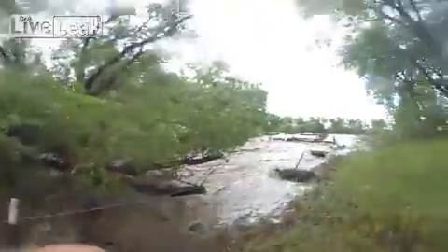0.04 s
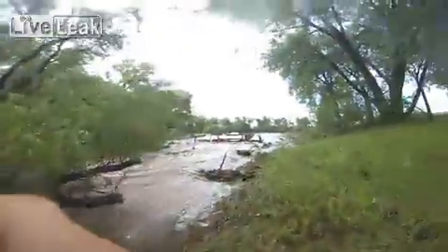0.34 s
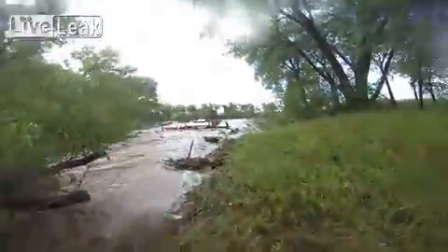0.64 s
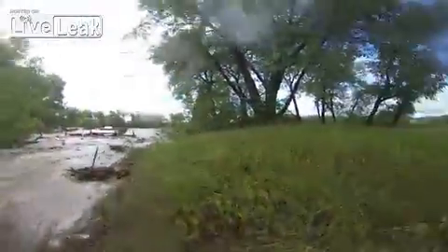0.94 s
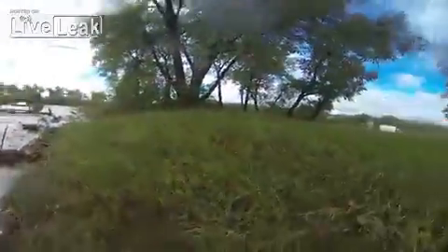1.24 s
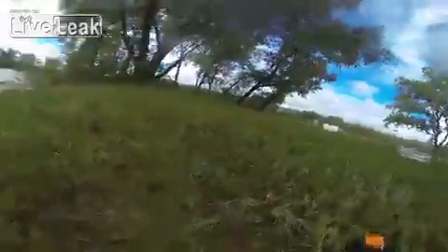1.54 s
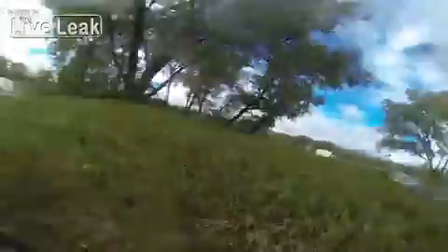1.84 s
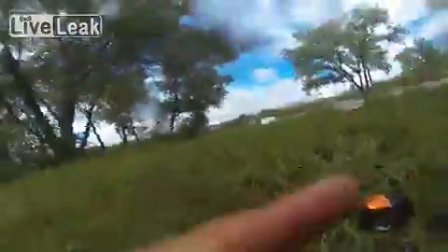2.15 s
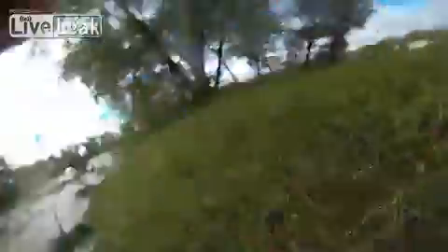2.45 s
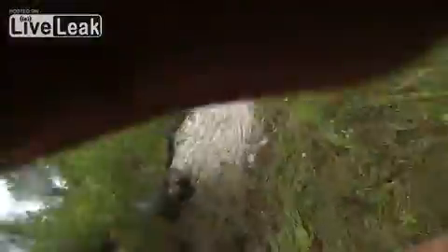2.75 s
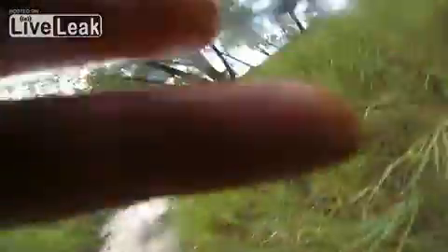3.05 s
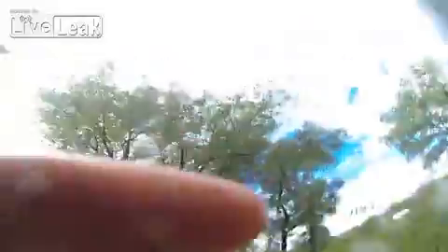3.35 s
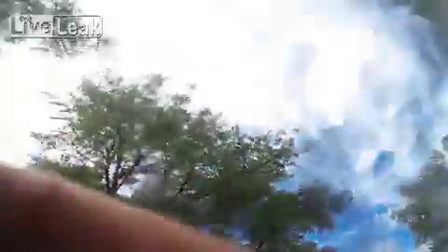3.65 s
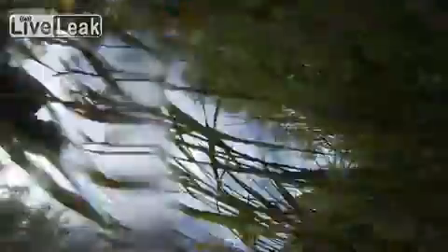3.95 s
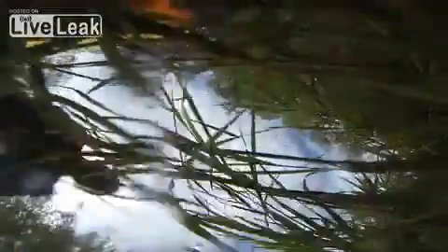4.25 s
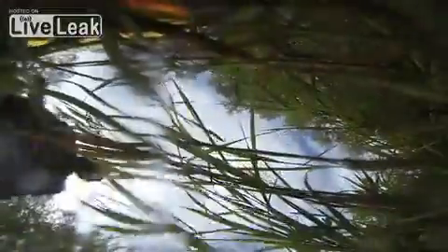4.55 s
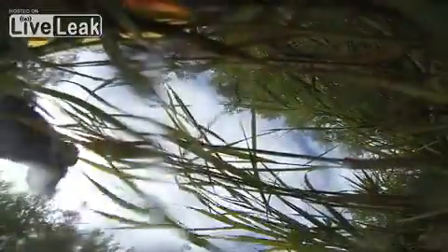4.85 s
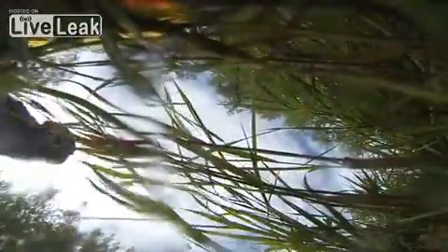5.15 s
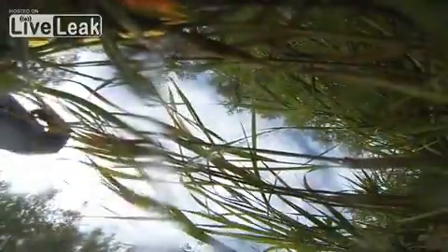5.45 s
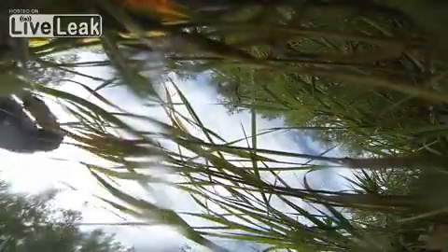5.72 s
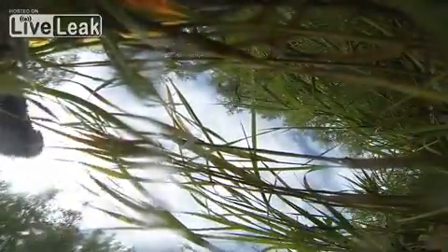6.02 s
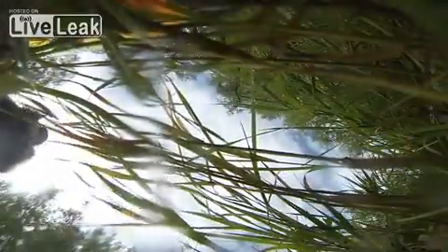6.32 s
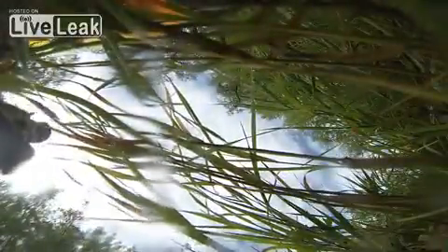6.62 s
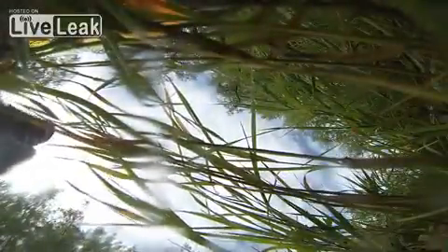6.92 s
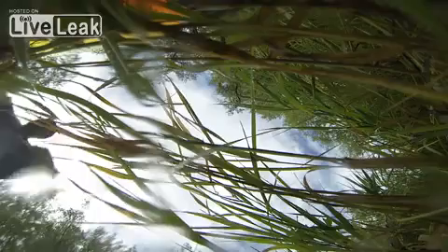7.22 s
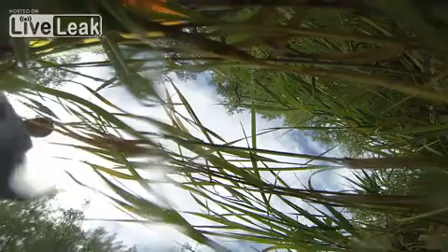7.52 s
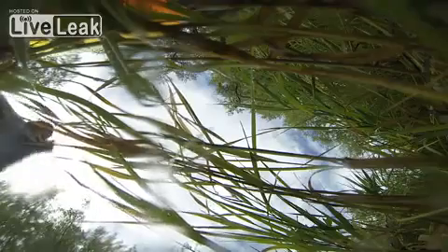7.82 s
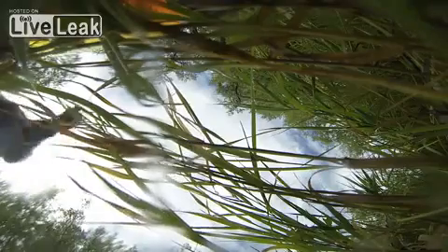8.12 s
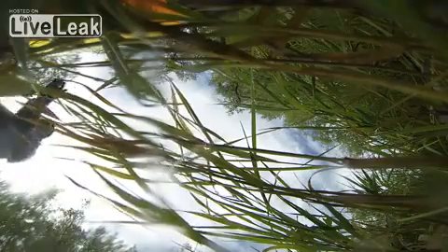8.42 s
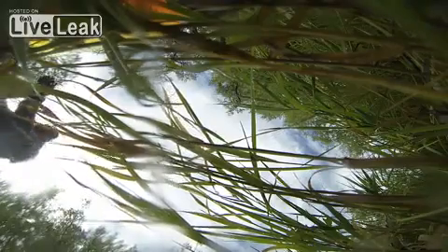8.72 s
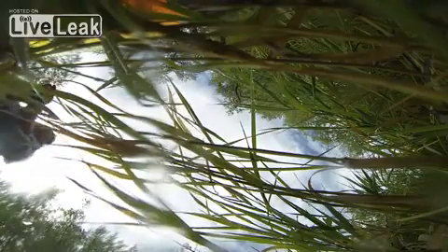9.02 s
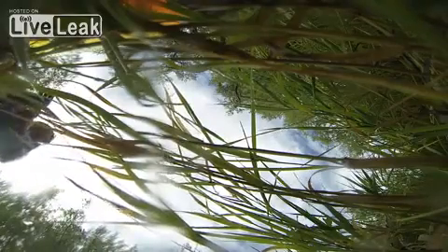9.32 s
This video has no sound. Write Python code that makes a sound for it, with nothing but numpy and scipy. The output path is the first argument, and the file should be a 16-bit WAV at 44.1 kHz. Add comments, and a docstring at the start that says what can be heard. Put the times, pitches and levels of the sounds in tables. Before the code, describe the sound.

Close finger knocks and rubbing on a plastic housing end in a scrape through grass, leaving a soft river hiss and light rustling steps.

```python
"""On the bank of a flooded river, in long grass, heard from one microphone inside a camera's plastic housing.
The camera is carried and fumbled: fingers thump, click and scuff on the shell, air buffets the port.
At 3.5 s it is dropped, slides through the stalks and lands. Then it lies still: the river, some way off,
hisses with countless small splashes, and someone shifts about in the grass nearby."""
import sys
import numpy as np
from scipy import signal
from scipy.fft import rfft, irfft, next_fast_len
from scipy.io import wavfile
from scipy.ndimage import uniform_filter1d

SR = 44100
rng = np.random.default_rng(int(sys.argv[2]) if len(sys.argv) > 2 else 0)


def wrap_up_sound(samples):
    """Save the sound to the file named by the first command line argument, as 16-bit audio."""
    columns = np.atleast_2d(samples).T
    # keep every value between -1 and 1, then stretch to whole-number steps
    tamed = np.clip(columns, -1, 1)
    steps = np.round(tamed * 32767).astype(np.int16)
    wavfile.write(sys.argv[1], SR, steps)


N = 417627
TIME = np.arange(N) / SR
AT_REST_S, SETTLE_S = 4.3, 0.3  # the camera starts coming to rest; the time it takes
CUTOFF_HZ = 9990

# Levels in the tables are relative: each source adds its own trim. # Level of the river's hiss at the
# microphone, low during the handling and rising from about 4 s: time_s, level_db
RIVER_CURVE = [(0, -72.5), (3.9, -71.5), (4.3, -58), (4.55, -50.5), (4.9, -47), (9.47, -47.5)]
# Spectrum of the river's low rush: frequency_hz, level_db
RUSH_SPECTRUM = [(12, -21.5), (20, 2.5), (107, -1.5), (323, -2), (364, -5.5), (460, -5), (1100, -14.5),
                 (1430, -47), (2420, -120)]
# Spectrum of its small splashes: frequency_hz, level_db
SPLASH_SPECTRUM = [(590, -41.5), (1000, -43), (1170, -4), (1320, 4), (1600, 2.5), (1920, -7), (2530, -8.5),
                   (2950, -2), (3930, -7.5), (4450, -16.5), (4940, -11), (5600, -18.5), (6340, -17),
                   (7900, -19), (9840, -35), (12800, -74.5), (21600, -120)]
# Someone treading and shifting in the grass nearby: start_s, length_s, tread_db, rustle_db
FOOTSTEPS = [(4.425, 0.031, -39, -48), (4.513, .14, -48, -52), (4.717, .04, -46.5, -49),
             (4.912, 0.16, -43, -44.5), (5.097, 0.088, -45, -45.5), (5.187, 0.032, -40.5, -64),
             (5.315, 0.036, -43, -62), (5.67, 0.1, -46, -60), (6.15, 0.22, -50, -71),
             (6.41, 0.025, -44.5, -59), (6.94, .04, -53, -59), (7.188, 0.055, -51, -50),
             (7.304, 0.038, -40.5, -48), (7.378, 0.024, -49.5, -54), (8.284, 0.038, -53, -56)]
# Air flowing past the microphone port as the camera swings: time_s, level_db
AIRFLOW_CURVE = [(0.0, -28.5), (0.44, -35.5), (1.24, -26.5), (1.35, -39.5), (1.62, -31.5), (2.2, -23.5),
                 (2.42, -20.5), (2.79, -27), (2.99, -21.5), (3.5, -32.5), (3.77, -33), (4.3, -56.5)]
# Spectrum of the eddies at the port: frequency_hz, level_db
EDDY_SPECTRUM = [(10, -22.5), (20, -8), (30, 0), (50, -15.5), (80, -23.5), (140, -25.5), (300, -48.5),
                 (800, -94)]
# Resonances of the housing: frequency_hz, width_hz, level_db
SHELL_MODES = [(589, 57, -4.5), (780, 355, -10), (1150, 69, 0.5), (1450, 263, 4.5), (1581, 258, 4.5),
               (2130, 247, -7.5), (2600, 590, -13), (3090, 315, -8.5), (3550, 1180, -19.5),
               (5140, 470, -21.5), (6300, 1500, -34.5)]
# Spectrum of dull rubbing: frequency_hz, level_db
RUB_SPECTRUM = [(30, -6.5), (70, -3.5), (130, -6), (195, 4.5), (260, -8.5), (350, -7), (480, -18),
                (750, -21), (1200, -40), (3000, -97)]
# Spectrum of the fine hiss of sliding: frequency_hz, level_db
HISS_SPECTRUM = [(1500, -13.5), (3000, 3), (3800, 12), (4600, 7.5), (5400, 6.5), (7000, 1.5), (8500, -3.5),
                 (10000, -19)]
# The camera ploughs through grass, then stalks settle on it:
# start_s, length_s, scrape_db, dull_db, rustle_db
GRASS_SLIDES = [(3.637, 0.084, -24, -22.5, -29.5), (3.743, 0.034, -26, -24, -42),
                (3.816, 0.032, -25, -25.5, -25.5), (3.929, .07, -35, -38.5, -41),
                (4.066, 0.12, -45, -45, -46)]
# The hand's steady grip, which lets go in the grass: time_s, dull_db, rustle_db
GRIP_CURVE = [(0.0, -34, -40.5), (0.33, -45.5, -52.5), (0.86, -29, -43.5), (1.17, -33.5, -47.5),
              (1.33, -48.5, -56), (1.56, -39, -51.5), (1.82, -30.5, -51), (1.9, -42, -51.5),
              (2.41, -42.5, -47.5), (2.69, -43, -45), (3.41, -42, -42.5), (3.71, -38, -40),
              (3.83, -29, -34.5), (4.3, -48.5, -56)]
# Skin, cloth and grass sliding over the shell: middle_s, length_s, level_db, ring_hz, hiss_db, dull_db
SHELL_SCUFFS = [(0.12, 0.06, -33, 1030, -53, -29.5), (0.278, 0.059, -39, 1290, -49, -39),
                (0.358, 0.047, -44, 1440, -68, -36.5), (0.476, 0.027, -42, 1450, -61, -32.5),
                (0.558, 0.029, -43, 1450, -66, -28.5), (0.61, 0.0064, -25, 1600, -60, -26),
                (0.775, 0.054, -40, 1450, -64, -47), (0.886, 0.052, -42.5, 600, -79, -32.5),
                (1.039, 0.016, -30, 2660, -66, -41), (1.04, .012, -35, 3200, -74, -45),
                (1.106, 0.046, -27.5, 1284, -48.5, -41), (1.187, 0.13, -39.5, 1440, -56.5, -38),
                (1.246, 0.04, -31.5, 1380, -55, -42), (1.272, 0.015, -21, 1550, -57, -17.5),
                (1.276, 0.0039, -22, 1630, -42, -24), (1.312, 0.0066, -37, 2840, -50, -34),
                (1.324, 0.035, -37, 1530, -74, -33), (1.589, 0.014, -28, 1460, -47, -45),
                (1.6, 0.037, -30, 1250, -80, -26.5), (1.724, 0.1, -36, 1414, -58.5, -33),
                (1.899, 0.016, -33, 1150, -50.5, -36), (1.944, 0.015, -27.5, 1410, -47, -21),
                (1.984, 0.028, -37, 1550, -71, -43), (2.019, 0.01, -31, 1490, -70, -17.5),
                (2.116, 0.031, -33.5, 2050, -85, -45), (2.18, 0.035, -46.5, 790, -51.5, -37),
                (2.234, 0.036, -49, 1440, -51, -44), (2.315, 0.015, -30.5, 1450, -34.5, -32),
                (2.337, 0.015, -30, 730, -48, -39), (2.339, 0.025, -26, 1550, -38.5, -30),
                (2.49, 0.024, -38.5, 1510, -60, -34), (2.619, 0.01, -30.5, 1550, -41, -40),
                (2.705, 0.041, -47, 1450, -56, -27), (2.867, 0.078, -35.5, 1710, -56.5, -29.5),
                (2.899, 0.0076, -51, 1690, -44, -28), (3.002, 0.035, -34, 1450, -45.5, -30.5),
                (3.069, 0.054, -34, 1140, -52, -34), (3.117, 0.036, -30, 1090, -42, -29.5),
                (3.194, 0.0098, -39.5, 1250, -54.5, -44), (3.287, 0.031, -40.5, 1500, -49.5, -36.5),
                (3.358, 0.036, -37.5, 1320, -47.5, -32), (3.432, 0.043, -27.5, 1190, -44, -39),
                (3.504, 0.016, -39, 695, -75, -26.5), (3.565, 0.011, -42, 780, -60, -26.5),
                (3.595, .04, -42.5, 2590, -43.5, -54), (3.833, 0.075, -38, 1450, -36, -34),
                (4.13, 0.0069, -35, 520, -73, -24), (4.274, 0.01, -49, 460, -90, -43),
                (5.85, 0.0045, -64, 1500, -55, -72), (8.154, 0.0065, -55, 1500, -49, -69)]
# Sharp clicks and knocks on the shell, and later a few muffled drips:
# time_s, level_db, ring_hz, length_s, hardness_db
KNOCKS_AND_DRIPS = [(0.055, -28.5, 1800, 0.0015, -16), (0.2236, -27, 1360, 0.00076, -18),
                    (0.296, -22.5, 1090, 0.002, -7), (0.4106, -7.5, 1440, 0.00061, -16),
                    (0.4582, -28.5, 1350, 0.0013, -11), (0.5717, -11.5, 1450, 0.00037, -43),
                    (0.6068, -11, 1420, 0.0016, -21), (0.6637, -30, 1300, 0.0013, -17),
                    (0.755, -24, 1020, 0.0039, -43), (0.7925, -27.5, 1420, 0.0017, 0.5),
                    (0.831, -17.5, 1100, 0.00071, -47), (0.8578, -15.5, 1370, 0.00059, -36),
                    (0.9763, -26.7, 1350, 0.0016, -28), (0.9915, -14, 1580, 0.0025, -32),
                    (0.996, -14, 1187, 0.00097, -39), (1.0125, -10.5, 1540, 0.0013, -34),
                    (1.222, -19.5, 1410, 0.0021, -29), (1.268, -11, 785, 0.0016, -20),
                    (1.2723, 0.5, 1700, 0.00072, -21), (1.2734, -2, 2100, 0.0008, -17),
                    (1.279, -8.5, 1610, 0.0016, 2.5), (1.3489, -38, 1480, 0.0015, -18),
                    (1.477, -27, 1520, 0.0015, -19), (1.58, -17, 1440, 0.0024, -12),
                    (1.595, -12, 1450, 0.0031, -13.5), (1.754, -19.5, 1290, 0.0062, -7.5),
                    (1.7686, -11, 1404, 0.00061, -41), (1.8444, -33.5, 1370, 0.0033, -6),
                    (1.9407, -19, 1669, 0.00083, -5), (2.0189, -15.5, 1200, 0.0031, -18),
                    (2.02, -28, 550, 0.0041, -28), (2.334, -18.5, 750, 0.0025, 1.5),
                    (2.374, -29, 1425, 0.0022, -4), (2.695, -20, 1410, 0.0012, -16),
                    (2.7897, -31.5, 694, 0.0017, -20), (2.849, -19.5, 1590, 0.0023, -39),
                    (3.134, -18, 1700, 0.001, -8.5), (3.4437, -14, 1200, 0.00058, -39),
                    (3.5413, 3, 2200, 0.0006, 1), (3.542, -2.5, 3000, 0.00064, -0.5),
                    (3.5603, -11.5, 2000, 0.0018, -12), (3.5648, -11, 2050, 0.0011, 13),
                    (3.617, -20, 1670, 0.0012, 1.5), (3.643, -2.5, 1490, 0.00081, -1.5),
                    (3.661, -10, 1580, 0.0017, -26), (3.728, -5, 1570, 0.0016, -45),
                    (3.755, -13.5, 1630, 0.0013, -1.5), (3.773, -2, 1550, 0.0007, -9),
                    (4.429, -32, 1550, 0.0014, -26), (4.499, -34.5, 1500, 0.0015, -25),
                    (4.964, -22.5, 1530, 0.00087, -6), (4.9919, -11, 2060, 0.00054, -14),
                    (5.099, -26.5, 905, 0.0023, -19), (5.6032, -25.5, 1450, 0.0045, -8.5),
                    (7.1795, -34.5, 1480, 0.0024, -19.7), (7.2024, -26, 1540, 0.0012, -20.6),
                    (7.2068, -31, 1540, 0.005, -7), (7.395, -34.5, 1410, 0.0027, -25),
                    (8.015, -26.5, 1470, 0.0015, -23), (8.298, -32, 1240, 0.00085, -16),
                    (8.739, -30, 1530, 0.00084, -20)]
# Soft thumps on the shell and, at the lowest pitches, buffets of air: crest_s, level_db, nominal_pitch_hz
SOFT_THUMPS = [(0.0182, 1.5, 105), (0.1314, -12.5, 158), (0.156, -13, 158), (0.168, -18, 45),
               (0.299, -8.5, 198), (0.384, -7.5, 100), (0.4148, 0.5, 109.3), (0.542, -12, 144),
               (0.756, -12.5, 250), (0.836, -12.5, 138), (0.861, -12, 143), (1.0148, -6, 205),
               (1.032, -9.5, 89), (1.045, -12.5, 54.7), (1.0985, -10, 129), (1.198, -11.5, 83),
               (1.218, -3, 69.6), (1.243, -7.5, 56), (1.269, -14, 96), (1.28, 2, 174),
               (1.6736, -19.5, 69.3), (1.7313, -10, 161), (1.7566, -4, 87), (1.7688, -3, 48),
               (1.9426, -3, 152), (1.951, -8, 150), (1.957, -3.5, 115), (2.0176, -6, 150),
               (2.033, -7.5, 124), (2.11, -11, 49.7), (2.129, -13.5, 89), (2.188, -12, 118),
               (2.244, -3, 116), (2.2567, -26, 50.7), (2.3469, -10, 123), (2.3715, -11.5, 50),
               (2.4153, -9, 146), (2.46, -14, 135), (2.489, -12.5, 178), (2.4999, -7, 104),
               (2.5534, -17, 45), (2.6967, -5.5, 133.5), (2.7898, -10, 112), (3.004, -16, 60.5),
               (3.0751, -3.5, 82), (3.085, -9, 90), (3.434, -17, 48), (3.504, -12, 111),
               (3.8529, -0.5, 126), (4.1298, -22, 204), (4.175, -28, 48), (6.4296, -43, 194)]


def from_db(db):
    """Decibels to gain."""
    return 10 ** (np.asarray(db) / 20)


def rms_one(x):
    """Scale to an rms of 1."""
    return x / np.sqrt(np.mean(x ** 2) + 1e-20)


def in_time(rows):
    """Each level column of a curve at every sample."""
    times, *columns = np.transpose(rows)
    return [np.interp(TIME, times, column) for column in columns]


def add(out, start_s, sound):
    """Mix a sound in from start_s."""
    start = int(round(start_s * SR))
    sound = sound[max(-start, 0):N - start]
    out[max(start, 0):max(start, 0) + len(sound)] += sound


def band(x, low_hz, high_hz):
    """A causal band-pass with fairly steep sides."""
    b, a = signal.butter(3, [low_hz, min(high_hz, SR * .45)], "band", fs=SR)
    return signal.lfilter(b, a, x)


def coloured(x, spectrum):
    """Shape a sound by a spectrum; rms 1."""
    hz, db = np.transpose(spectrum)
    size = next_fast_len(len(x))
    bins_hz = np.fft.rfftfreq(size, 1 / SR) + 1e-3
    gain = from_db(np.interp(np.log(bins_hz), np.log(hz), db))
    return rms_one(irfft(rfft(x, size) * gain, size)[:len(x)])


def resonance(x, hz, width_hz):
    """Two-pole resonance with a gain of 1 at its peak."""
    r = np.exp(-np.pi * width_hz / SR)
    drive = np.convolve(x, [1, 0, -1])[:len(x)] + 1e-18
    return signal.lfilter([(1 - r * r) / 2], [1, -2 * r * np.cos(2 * np.pi * hz / SR), r * r], drive)


def drift(per_s, size=N):
    """A random wander with a spread of about 1."""
    t = np.arange(size) / SR
    return np.interp(t * per_s, np.arange(4096), rng.standard_normal(4096))


def swells(starts_s, lengths_s, levels_db, attack_s, release_s):
    """Joint gain of pushes that each build up, hold for their length and die away."""
    power, t = np.zeros(N), np.arange(SR) / SR - 1 / 4
    for start_s, length_s, db in np.broadcast(starts_s, lengths_s, levels_db):
        shape = np.exp(np.minimum(t, 0) / attack_s - np.maximum(t - length_s, 0) / release_s)
        add(power, start_s + t[0], (from_db(db) * shape) ** 2)
    return np.sqrt(power)


def moving():
    """1 while the camera moves, 0 once it lies still."""
    return np.interp(TIME, [AT_REST_S, AT_REST_S + SETTLE_S], [1, 0])


def friction(size, per_s, spread_db, smooth):
    """Tiny slips of uneven strength over a smooth sliding noise; rms 1."""
    strength = from_db(spread_db * np.minimum(rng.exponential(1, size), 4))
    slips = (rng.random(size) < per_s / SR) * strength * rng.choice([-1, 1], size)
    return rms_one(rms_one(slips) + smooth * rng.standard_normal(size))


def shell(force):
    """The housing rings around the microphone in all its modes."""
    return sum((-1) ** k * from_db(db) * resonance(force, hz, width_hz)
               for k, (hz, width_hz, db) in enumerate(SHELL_MODES))


def contact(force, hz, width_hz, housing_gain):
    """The touched spot rings at a pitch of its own over the housing's lower modes; rms 1."""
    spot = resonance(resonance(force, hz, width_hz), hz, 4 * width_hz)
    housing = band(shell(force), 300, 3270)
    return rms_one(rms_one(spot) + housing_gain * rms_one(housing))


def rubbing(dull_gain, rustle_gain):
    """Continuous contact: a dull flexing and a soft rustle share one unsteady pressure."""
    pressure = from_db(2.8 * drift(per_s=80))
    rustle = rms_one(shell(friction(N, per_s=2000, spread_db=2.5, smooth=.8)))
    flexing = coloured(rng.standard_normal(N), RUB_SPECTRUM)
    return pressure * (dull_gain * flexing + rustle_gain * rustle)


def river(rush_db=-3.0, hiss_db=-6.5):
    """Floodwater some way off: a low rush and the hiss of countless small splashes."""
    rush = from_db(rush_db) * coloured(rng.standard_normal(N), RUSH_SPECTRUM)
    splashes = coloured(friction(N, per_s=1900, spread_db=0.0, smooth=0.99), SPLASH_SPECTRUM)
    hiss = from_db(hiss_db + .5 * drift(per_s=5.3)) * splashes
    return from_db(in_time(RIVER_CURVE)[0]) * (rush + hiss)


def footsteps(rustle_trim_db=-3.0, attack_s=0.012, release_s=0.038):
    """Near the fallen camera, each step presses on the ground and bends the grass."""
    start_s, length_s, tread_db, rustle_db = np.transpose(FOOTSTEPS)
    tread = swells(start_s, length_s, tread_db, attack_s, release_s)
    rustle = swells(start_s, length_s, rustle_db + rustle_trim_db, attack_s, release_s)
    return rubbing(tread, rustle)


def grass_ticks(per_s=9, resting_db=-36.0, over_rustle_db=13.0):
    """Faint touches of grass and drops on the shell; in the hand their strength follows the grip."""
    touches = (rng.random(N) < per_s / SR) * rng.uniform(0.32, 1, N)
    in_hand_db = in_time(GRIP_CURVE)[1] + over_rustle_db
    touch_db = resting_db + (in_hand_db - resting_db) * moving()
    unit_peak = abs(shell(signal.unit_impulse(256))).max()
    return band(shell(touches * from_db(touch_db)), 300, 4200) / unit_peak


def air_buffeting(flow_db=1.5, gust_db=8.5, gust_db_per_db=.25, gust_db_per_octave=-3.0):
    """Eddies at the microphone port follow the swing; a gust comes with each thump, most with a low one."""
    eddies = coloured(rng.standard_normal(N), EDDY_SPECTRUM)
    eddies /= np.sqrt(uniform_filter1d(eddies ** 2, size=4000) + 0.074)  # even out the slow surges
    lumps = from_db(3.2 * drift(per_s=28))
    thump_s, thump_db, thump_hz = np.transpose(SOFT_THUMPS)
    octaves = np.log2(thump_hz / np.median(thump_hz))
    lift_db = gust_db + gust_db_per_db * thump_db + gust_db_per_octave * octaves
    gusts = swells(thump_s, 0, lift_db, attack_s=0.013, release_s=0.045)
    airflow = from_db(in_time(AIRFLOW_CURVE)[0]) * np.hypot(from_db(flow_db), gusts)
    return airflow * lumps * eddies * moving()


def grass_slide(hiss_db=-19.0, hollow_db=-21.5, attack_s=0.017, release_s=0.0063):
    """Wet stalks rake the housing, keep its main resonance singing and flex its wall."""
    start_s, length_s, *levels_db = np.transpose(GRASS_SLIDES)
    raking, dull, rustle = [swells(start_s, length_s, db, attack_s, release_s) for db in levels_db]
    slips = friction(N, per_s=1100, spread_db=5.0, smooth=0.25)
    ring = contact(slips, hz=1550, width_hz=210, housing_gain=0.23)
    hiss = from_db(hiss_db) * coloured(slips, HISS_SPECTRUM)
    hollow = from_db(hollow_db) * rms_one(band(slips, 350, 1100))
    return raking * (ring + hiss + hollow) + rubbing(dull, rustle)


def hands(dull_trim_db=-3.5, rustle_trim_db=-3.0, skid_dull_db=-20.0, skid_rustle_db=-40.0):
    """The grip rubs while the camera moves; fingers skid at each thump, and each scuff flexes the wall."""
    dull_db, rustle_db = in_time(GRIP_CURVE)
    thump_s, thump_db, _ = np.transpose(SOFT_THUMPS)
    skids = swells(thump_s, 0, thump_db, attack_s=0.01, release_s=0.0083)
    middle_s, length_s, *_, flex_db = np.transpose(SHELL_SCUFFS)
    strokes = swells(middle_s - length_s / 2, length_s, flex_db - 0.5, attack_s=0.0039, release_s=0.0047)
    dull = np.hypot(from_db(dull_db + dull_trim_db) * moving(), from_db(skid_dull_db) * skids)
    rustle = np.hypot(from_db(rustle_db + rustle_trim_db) * moving(), from_db(skid_rustle_db) * skids)
    return rubbing(np.hypot(dull, strokes), rustle)


def scuffs(hiss_trim_db=-2.0, hollow_db=-9.0):
    """Short strokes: dense slips swell and fade, ringing the shell with a hollow rub and a fine hiss."""
    out, t = np.zeros(N), (np.arange(8192) - 4096) / SR
    for middle_s, length_s, db, ring_hz, hiss_db, _ in SHELL_SCUFFS:
        stroke = np.exp(-abs(t / (0.66 * length_s)) ** 2.06)
        pressure = stroke * from_db(3.4 * drift(per_s=158, size=len(t)))
        slips = friction(len(t), per_s=1500, spread_db=2.0, smooth=0.54)
        ring = contact(slips, ring_hz, width_hz=0.09 * ring_hz, housing_gain=0.93)
        hollow = from_db(hollow_db) * rms_one(band(slips, 548, 933))
        hiss = from_db(hiss_db + hiss_trim_db) * coloured(slips, HISS_SPECTRUM)
        add(out, middle_s + t[0], pressure * (from_db(db) * (ring + hollow) + hiss))
    return out


def knocks(skid_gain=0.19, crack_trim_db=-3.0, hollow_db=-13.0, typical_db=-18):
    """A knock or drip on the shell builds up, snaps and dies away; a hard one wakes the high modes."""
    out, t = np.zeros(N), (np.arange(3072) - 768) / SR
    snap = t == 0
    for time_s, db, ring_hz, length_s, hardness_db in KNOCKS_AND_DRIPS:
        slope_s = length_s * np.where(t < 0, .6, 1.2)  # builds twice as fast as it fades
        pressure = np.exp(-abs(t) / slope_s) + 0.089 * np.exp(-abs(t) / 0.003)
        force = snap + skid_gain * rng.standard_normal(len(t)) * pressure
        spread = from_db(0.13 * (db - typical_db))  # a strong knock stirs more of the housing
        ring = contact(force, ring_hz, width_hz=149, housing_gain=0.71 * spread)
        crack = from_db(hardness_db + crack_trim_db) * rms_one(band(shell(force), 2470, 7200))
        hollow = spread * from_db(hollow_db) * rms_one(band(force, 380, 1095))
        # a decaying burst carries an energy of peak squared times length over two
        burst_rms = from_db(db) * np.sqrt(length_s * SR / (2 * len(t)))
        add(out, time_s + t[0], burst_rms * rms_one(ring + crack + hollow))
    return out


def thumps(trim_db=-3.0, flex_db=-16.5, flex_hz=330):
    """A soft blow or a buffet of air gives one main swing and a rebound, and flexes the housing's wall."""
    out, t = np.zeros(N), np.arange(SR // 10) / SR
    for crest_s, db, nominal_hz in SOFT_THUMPS:
        rise_s, swing_hz = 0.54 / nominal_hz, 0.811 * nominal_hz
        push = (t / rise_s * np.exp(1 - t / rise_s)) ** 5
        # quicker blows drive the flexing mode harder
        flex = from_db(flex_db) * (nominal_hz / 150) ** 2 * np.sin(2 * np.pi * flex_hz * t)
        swing = push * (np.sin(2 * np.pi * swing_hz * t) + flex)
        crest = np.argmax(abs(swing))
        add(out, crest_s - crest / SR, from_db(db + trim_db) * swing / abs(swing[crest]))
    return out


def scene():
    """Everything reaches one microphone inside the housing, in the open with no room around it."""
    close_up = thumps() + knocks() + scuffs() + grass_ticks() + grass_slide() + hands()
    return (close_up + footsteps() + air_buffeting() + river())[None]


def record(dry, ceiling=.93, rolloff_hz=8800):
    """The hardest blows are rounded off by overload; the treble rolls away and the top is cut."""
    rounded = dry / (1 + (dry / ceiling) ** 6) ** (1 / 6)
    dulled = signal.sosfilt(signal.butter(4, rolloff_hz, fs=SR, output="sos"), rounded)
    return signal.sosfilt(signal.ellip(10, .2, 80, CUTOFF_HZ, fs=SR, output="sos"), dulled)


dry = scene()
out = record(dry)
wrap_up_sound(out)
```